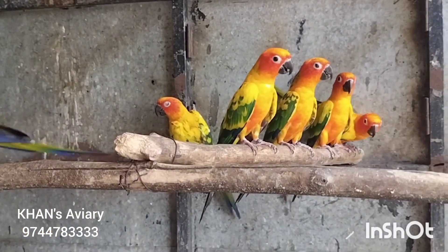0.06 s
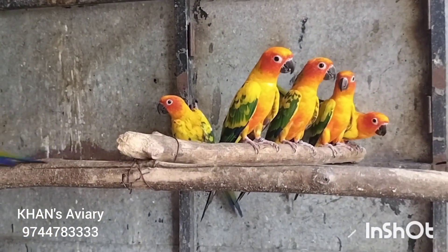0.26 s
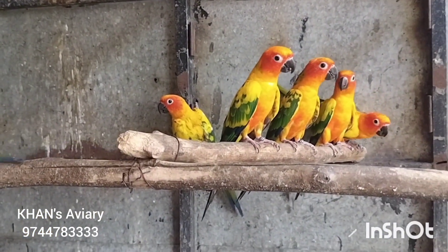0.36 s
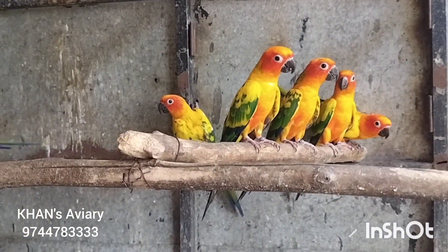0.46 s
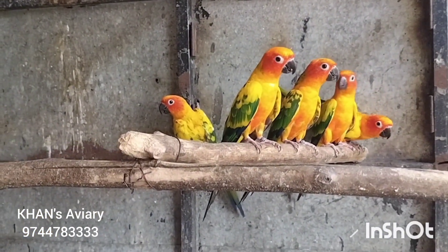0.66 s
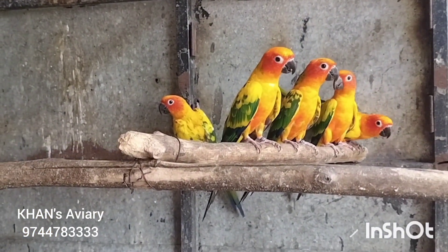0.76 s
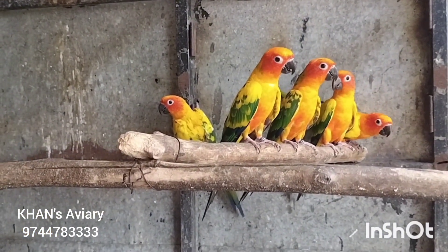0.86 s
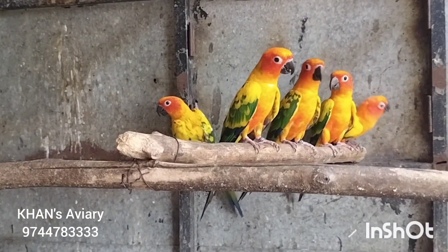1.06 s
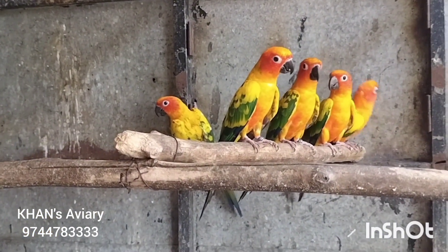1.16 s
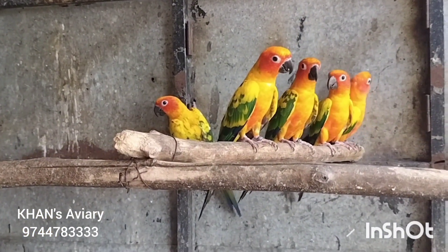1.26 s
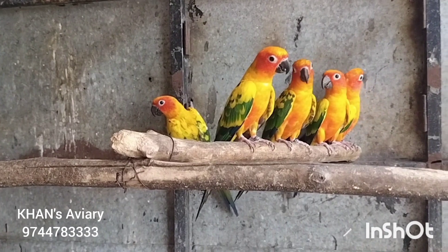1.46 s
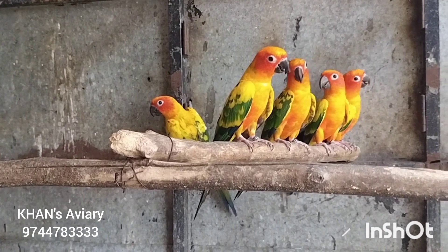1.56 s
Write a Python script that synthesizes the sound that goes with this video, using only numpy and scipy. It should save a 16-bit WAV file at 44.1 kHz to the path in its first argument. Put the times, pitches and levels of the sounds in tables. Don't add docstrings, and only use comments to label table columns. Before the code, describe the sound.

Shrill parrot screeches, rough and fluttering, burst out in quick succession and ring off hard walls.

```python
import sys
import numpy as np
from scipy import signal
from scipy.fft import rfft, irfft, next_fast_len
from scipy.io import wavfile
from scipy.ndimage import uniform_filter1d, map_coordinates

SR = 44100
rng = np.random.default_rng(int(sys.argv[2]) if len(sys.argv) > 2 else 0)


def wav_record(signal):
    frames = np.transpose(np.atleast_2d(signal))
    bounded = np.clip(frames, -1, 1)
    quanta = np.round(bounded * 32767).astype(np.int16)
    wavfile.write(sys.argv[1], SR, quanta)


def boost(x):
    u = np.asarray(x, float) / 20
    return 10 ** u


N = 72765
TOP_HZ = 15700

# start_s, pitch_hz, level_db
FADING = [(0, 906, -22.5), (.028, 900, -44), (.05, 898, -37)]
HIGH = [(.182, 2150, -34), (.198, 2280, -26), (.215, 2230, -31), (.27, 2270, -23), (.295, 2500, -20),
        (.33, 2370, -22), (.343, 2350, -32), (.355, 2490, -21), (.367, 2320, -22), (.397, 2230, -36)]
LOW = [(.17, 800, -42), (.19, 859.7, -25.5), (.225, 788.5, -33), (.25, 810.6, -25), (.278, 783.2, -28),
       (.305, 788.7, -24.5), (.335, 770.3, -30.5), (.343, 800, -46), (.355, 868, -24), (.385, 818, -26.5),
       (.4, 800, -31)]
LEAD = [(.413, 2250, -30), (.417, 2290, -17), (.424, 2260, -26), (.431, 2370, -22), (.442, 2450, -27)]
ARCH = [(.434, 1750, -34), (.445, 1850, -21), (.458, 1950, -13), (.47, 2020, -15), (.485, 2045, -14),
        (.5, 2000, -12.5), (.512, 1900, -15), (.522, 1820, -22)]
BREAK = [(.51, 966, -39.5), (.518, 932, -1), (.528, 794, -34)]
LOUD = [(.738, 1036, -38), (.755, 1050, -25), (.78, 1050, -17.5), (.82, 1064, -16.5), (.86, 1085, -15.5),
        (.89, 1050, -15.5), (.92, 984, -18), (.94, 921, -24), (.948, 920, -50)]
MATE = [(.74, 760, -37), (.78, 1180, -28), (.82, 1450, -25), (.87, 1519, -23), (.92, 1432, -21),
        (.942, 1395, -19), (.95, 1380, -40)]
CHATTER = [(1.033, 980, -29), (1.054, 900, -32), (1.057, 1380, -31), (1.075, 1250, -32), (1.079, 1570, -24),
           (1.105, 1580, -21), (1.125, 1575, -24), (1.145, 1565, -23), (1.166, 1550, -31)]
FAR = [(1.433, 1017, -70), (1.446, 1061, -42), (1.49, 1089, -42.5), (1.505, 1259, -41.5),
       (1.525, 1262, -35.5), (1.537, 1122, -37.5), (1.585, 1116, -37), (1.6, 997, -38.5), (1.65, 1000, -50)]


def unit(x):
    return x / np.sqrt(np.mean(x ** 2) + 1e-20)


def along(points, hz):
    point_hz, value = np.transpose(points)
    return np.interp(np.log(hz + 1), np.log(point_hz + 1), value)


def wobble(n, rate):
    return map_coordinates(rng.standard_normal(n // 8 + 8), [np.arange(n) * min(rate / SR, 1 / 8)])


def filtered(x, response):
    m = next_fast_len(N + SR // 2)
    return irfft(rfft(x, m) * response(np.fft.rfftfreq(m, 1 / SR)), m)[..., :N]


def syrinx_bursts(t, rate, speeding, hoarse, rise):
    phase = (rate * t + speeding * t * t / 2 + 0.2 * hoarse * wobble(len(t), 30)) % 1
    attack = np.sin(np.pi / 2 * phase / rise)
    sag = np.cos(np.pi / 2 * (phase - rise) / (1 - rise))
    return phase, np.where(phase < rise, attack, sag)


def vocal_tract(hz, cut_hz, tilt_db, beak_hz, beak_db, tongue_hz, tongue_db):
    # hz, gain_db
    throat = [(290, -77), (500, -3.5), (3850, -1), (6750, -12), (8500, -14), (9960, -25.5), (10900, -25),
              (14100, -36), (15600, -39)]
    beak = beak_db * np.exp(-((hz - beak_hz) / 500) ** 2)
    tongue = tongue_db * np.exp(-((hz - tongue_hz) / 500) ** 2)
    tilt = tilt_db * np.log2((hz + 1) / 4000)
    low_cut = 1 + (cut_hz / (hz + 1)) ** 4
    return boost(along(throat, hz) + tilt + beak + tongue) / low_cut * (hz < TOP_HZ)


def cry(rows, rate, speeding, depth_db, half_db, mouth, hoarse, dip, rise):
    s, hz, db = np.transpose(rows)
    first = round(s[0] * SR)
    n = min(round(s[-1] * SR), N) - first
    t = np.arange(n) / SR
    phase, burst = syrinx_bursts(t, rate, speeding, hoarse, rise)

    flat_share = 0.33
    flat = uniform_filter1d(1 - np.tanh((phase - flat_share) / 0.015), size=20) / 2
    bend = 1 - dip * flat + 0.005 * wobble(n, 59.9) + 0.16 * hoarse * wobble(n, 690)
    pitch = np.interp(t + s[0], s, hz) * bend
    half_turn = np.pi * np.cumsum(pitch) / SR

    k = np.arange(1, 38)[:, None]
    drift = np.array([wobble(n, 151.0) for _ in k])
    half_tones_db = (k % 2) * (half_db + 4 * wobble(n, 70))
    gain = vocal_tract(k * pitch / 2, *mouth) * boost((1.2 + 9 * hoarse) * drift + half_tones_db)
    tone = unit((gain * np.sin(k * half_turn + 2 * np.pi * rng.random(k.shape))).sum(0))

    mouth_gain = vocal_tract(np.fft.rfftfreq(256, 1 / SR), *mouth)
    mouth_ring = np.fft.fftshift(irfft(mouth_gain)) * np.hanning(256)
    breath = rng.standard_normal(n) * (1 + np.sin(2 * half_turn))
    rasp = unit(signal.fftconvolve(breath, mouth_ring, "same"))

    voice = np.sqrt(1 - hoarse) * tone + np.sqrt(hoarse) * rasp
    voice = unit(voice * boost(depth_db * (burst - 1) + 1.5 * wobble(n, 200)))
    edge = np.clip(np.minimum(t, t[-1] - t) / 0.00083, 0, 1)
    return np.pad(voice * boost(np.interp(t + s[0], s, db)) * edge, (first, N - first - n))


def walls(x):
    # hz, t60_s
    wall_decay = [(500, 0.1), (2000, 0.45), (5000, 0.41), (12000, 0.14)]
    hz, t, z = signal.stft(rng.standard_normal((2, SR)), SR, nperseg=256)
    tail = signal.istft(z * boost(-60 * t / along(wall_decay, hz)[:, None]), SR, nperseg=256)[1]
    tail = tail / np.linalg.norm(tail[0])
    echo_at = rng.integers(0, 900, (2, 6))
    tail[np.arange(2)[:, None], echo_at] += 0.15 * rng.standard_normal((2, 6))
    delayed = np.pad(x, (260, 0))[None]
    return signal.fftconvolve(delayed, tail, axes=1)[:, :N]


def to_ports(x, pan_db):
    right_lag_s, shade_hz = 0.0003236, 2900

    def path(hz):
        lag = np.array([1 + 0 * hz, np.exp(-2j * np.pi * hz * right_lag_s)])
        shade = boost(np.array([[pan_db / 2], [-pan_db / 2]]) * hz ** 2 / (hz ** 2 + shade_hz ** 2))
        return lag * shade

    return filtered(x, path)


def parrots():
    # (bursts_per_s, speeding_per_s2, burst_depth_db, half_pitch_db, walls_db)
    birds = [
        (FADING, (82.5, -10, -1, -7.5, 3)),
        (HIGH, (103, -26, 9, -10.5, -4.5)),
        (LOW, (85.5, 6.5, 23, 0.5, -2)),
        (LEAD, (78, 10, 5, -4.5, -6)),
        (ARCH, (94.5, 22, 11, -28, -5.5)),
        (BREAK, (80, 0, 56, 41, -8)),
        (LOUD, (84, -59, 10, -7.5, -5.5)),
        (MATE, (75, -26.5, -8, -31, -11)),
        (CHATTER, (41.5, 124, 12.5, -32, -9.5)),
        (FAR, (85, -25.5, 11, -13, 0.5)),
    ]
    # mouth_cutoff_hz, brightness_db_per_octave, beak_hz, beak_db, tongue_hz, tongue_db,
    # left_over_right_db
    mouths = [(1600, -0.6, 6860, 11.5, 6530, -13.5, 1.5), (3200, -4.5, 4840, 4.5, 8500, 6, 15),
              (584, 0.5, 2790, 8, 1620, 7.5, -5), (1840, 2.5, 4600, 7.5, 6800, -4.5, 13),
              (1380, 4, 4750, 7.5, 6460, -11.5, 10), (1000, 1.5, 4000, -13, 520, -2.5, 18),
              (1840, 3.5, 4130, 1, 2560, -5.5, 6), (900, 0.4, 2660, -0.5, 6600, -1, 24),
              (800, -0.46, 2230, 6, 5550, 6, 7), (2090, -1.9, 2640, 7, 5100, 8.5, -15)]
    rasps = [(.2, .05, .2), (.11, .06, .25), (.14, .07, .25), (.12, .04, .2), (.065, .025, .35),
             (.35, .03, .14), (.06, .08, .35), (.1, .04, .3), (.09, .2, .3), (.14, .06, .15)]
    out = np.zeros((2, N))
    for (rows, (*flutter, wet_db)), (*mouth, pan_db), rasp in zip(birds, mouths, rasps):
        x = cry(rows, *flutter, mouth, *rasp)
        out += to_ports(x, pan_db) + boost(wet_db) * walls(x)
    return out


def rush(spectrum, patchy_db):
    # hz, correlation (0-1)
    alike = [(25, 0.63), (60, 0.67), (250, 0.96), (700, 0.33), (2000, 0.071)]
    z = signal.stft(rng.standard_normal((2, N)), nperseg=512)[2]
    patches = uniform_filter1d(rng.standard_normal(z.shape[1:]), 4, 0)
    patches = unit(uniform_filter1d(patches, 10, 1))
    pair = signal.istft(z * boost(patchy_db * patches), nperseg=512)[1][:, :N]

    def colour_and_width(hz):
        angle = np.arccos(np.clip(along(alike, hz), -1, 1)) / 2
        return boost(along(spectrum, hz)) * [np.cos(angle), np.sin(angle)]

    mid, side = filtered(pair, colour_and_width)
    return unit(np.array([mid + side, mid - side]))


def town_hum():
    # hz, level_db_per_hz
    hum_spectrum = [(15, -31), (25, -9.5), (230, -5.5), (275, -14.5), (372, -17), (438, -15.5), (525, -26),
                    (900, -25), (1170, -66), (1980, -120)]
    t = np.arange(N) / SR
    swell_db = 1.5 * wobble(N, 6.4)
    return boost(-53.5 - 1.0 * t + swell_db) * rush(hum_spectrum, patchy_db=2.0)


def far_motors():
    # hz, level_db
    motors = [(123, -56), (156, -56.5), (237, -69)]
    t = np.arange(N) / SR
    out = np.zeros(N)
    for hz, db in motors:
        level = boost(db + 0.5 - 1.7 * t + 0.84 * wobble(N, 5.8))
        out += level * np.sin(2 * np.pi * hz * t + 3.6 * wobble(N, 6.6))
    return out


def idling_engine():
    # start_s, pitch_hz, level_db
    idle = [(0.0, 90, -52), (0.022, 88.9, -51), (0.648, 88.7, -56), (0.876, 92.7, -55.5),
            (1.028, 86.6, -82), (1.144, 91.1, -72), (1.406, 92.6, -63), (1.65, 88.7, -52)]
    t = np.arange(N) / SR
    s, hz, db = np.transpose(idle)
    turn = 2 * np.pi * np.cumsum(np.interp(t, s, hz)) / SR
    return np.sqrt(2) * boost(np.interp(t, s, db)) * np.sin(turn)


def far_flock():
    # hz, level_db_per_hz
    flock_spectrum = [(350, -22), (600, -3), (879, 0.5), (1010, 0.5), (1270, 7), (2410, 2), (3520, 5),
                      (6870, -7), (15600, -25)]
    return boost(-49.5) * rush(flock_spectrum, patchy_db=1.0)


def scene():
    return parrots() + town_hum() + far_motors() + idling_engine() + far_flock()


def ports(hz):
    # hz, left_over_right_db
    port_tilt = [(60, -0.5), (500, 0), (1400, -2.5), (3000, 1.5), (6500, 5), (8500, -6.5), (11000, -14),
                 (15000, -12)]
    # hz, width_hz, left_db, right_db
    cavities = [(8600, 400, -13, -8), (9600, 500, 3, 6), (10700, 400, -6, -6), (11500, 400, -2, 4),
                (12500, 600, -15, -13), (13700, 450, 3, 5), (14600, 300, -12, -6), (6900, 500, 2, -3)]
    tilt_db = along(port_tilt, hz) / 2 * np.array([[1.], [-1.]])
    bumps_db = 0
    for mid_hz, width_hz, left_db, right_db in cavities:
        bumps_db = bumps_db + np.array([[left_db], [right_db]]) * np.exp(-((hz - mid_hz) / width_hz) ** 2)
    return boost(tilt_db + bumps_db) * (hz < TOP_HZ)


def roll_off(x):
    return signal.sosfilt(signal.butter(12, 15700, fs=SR, output="sos"), x)


def record(dry):
    x = filtered(dry, ports)
    x = x / (1 + np.abs(x) ** 8) ** (1 / 8)
    return roll_off(x)


dry = scene()
out = record(dry)
wav_record(out)
```